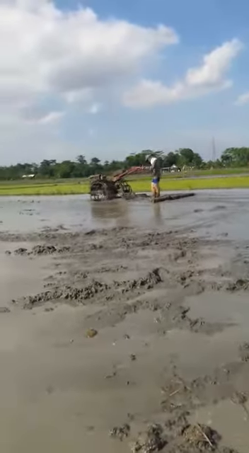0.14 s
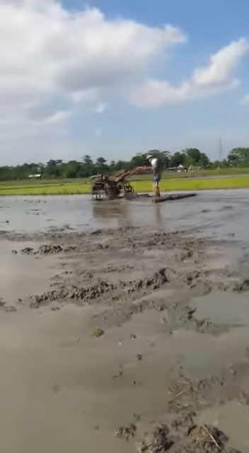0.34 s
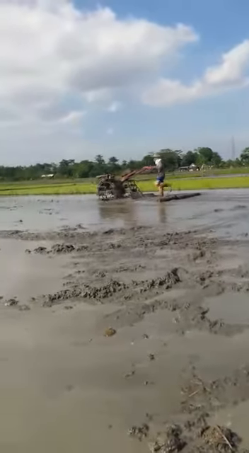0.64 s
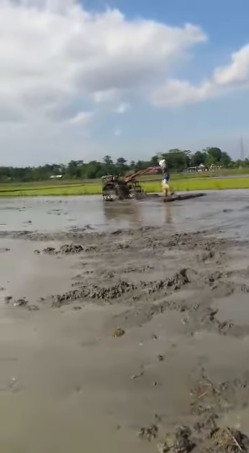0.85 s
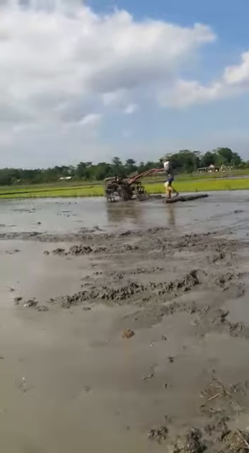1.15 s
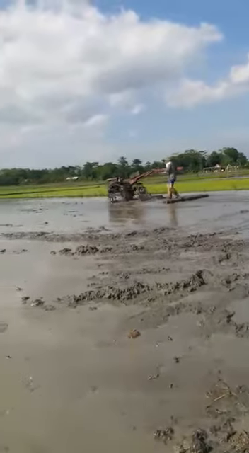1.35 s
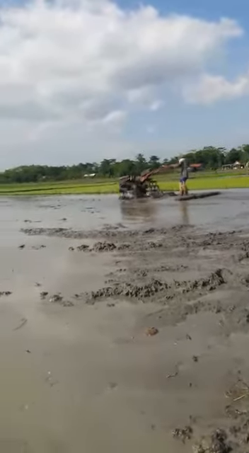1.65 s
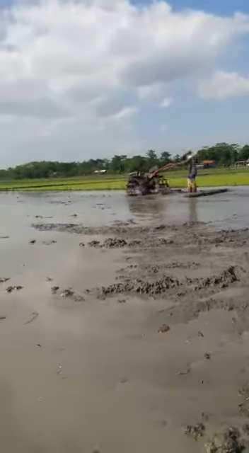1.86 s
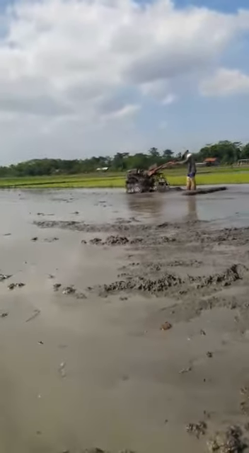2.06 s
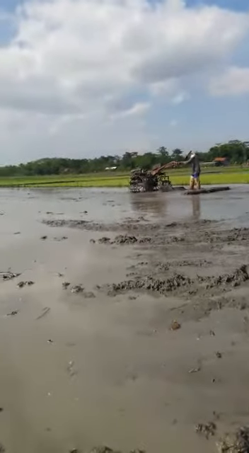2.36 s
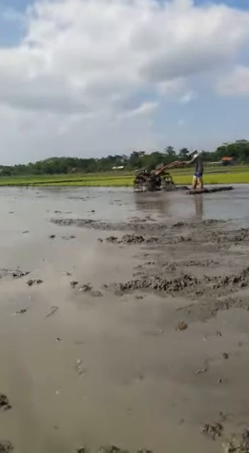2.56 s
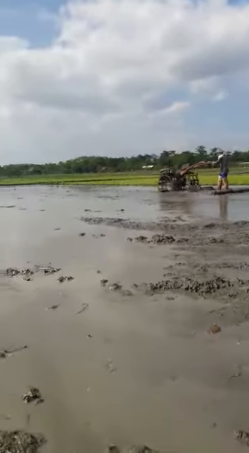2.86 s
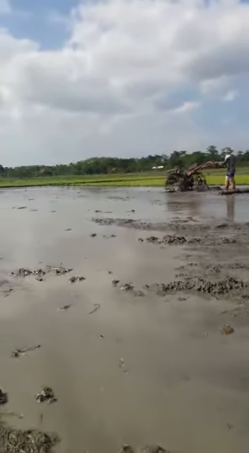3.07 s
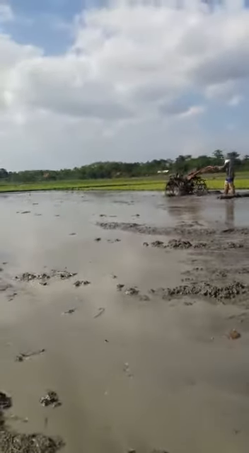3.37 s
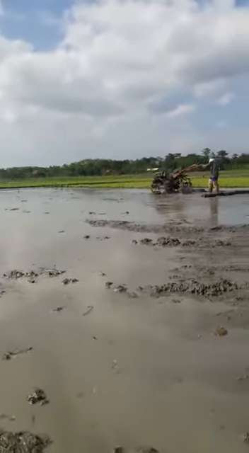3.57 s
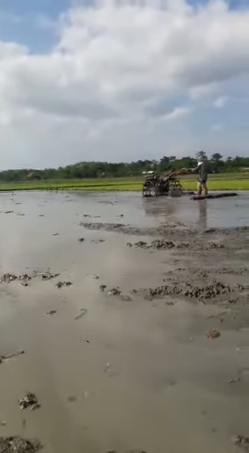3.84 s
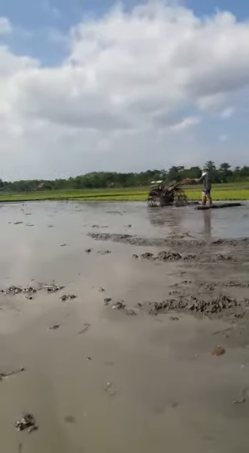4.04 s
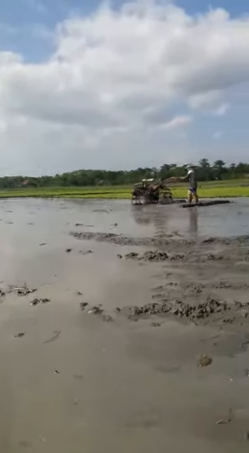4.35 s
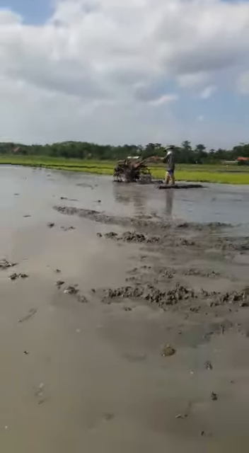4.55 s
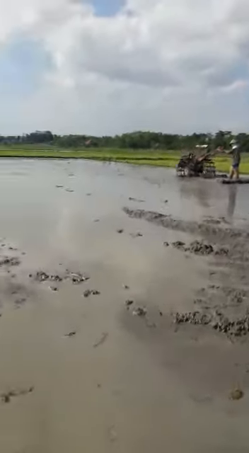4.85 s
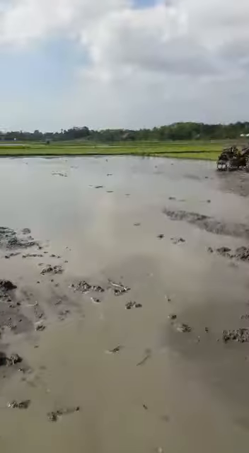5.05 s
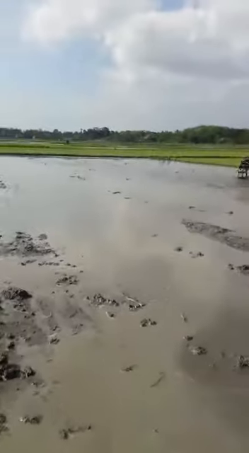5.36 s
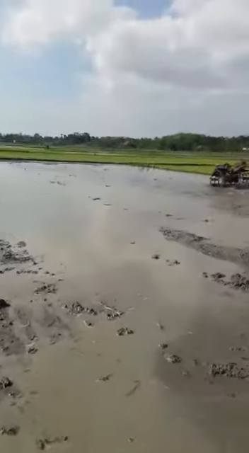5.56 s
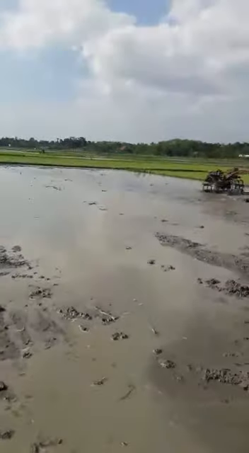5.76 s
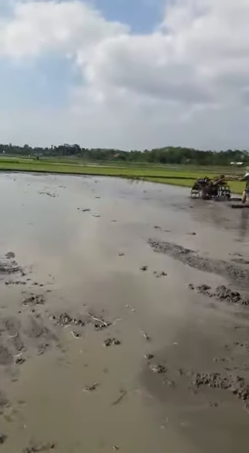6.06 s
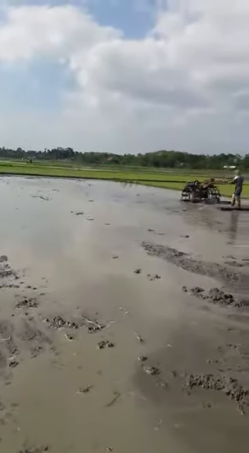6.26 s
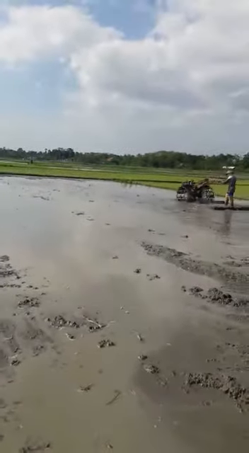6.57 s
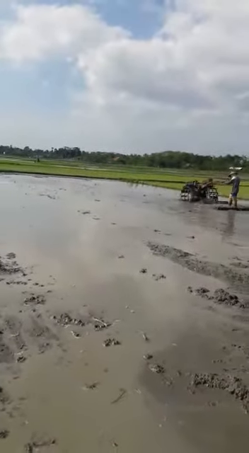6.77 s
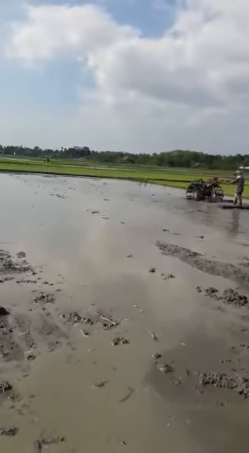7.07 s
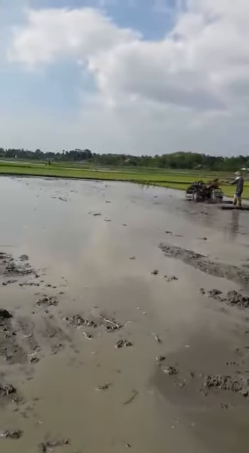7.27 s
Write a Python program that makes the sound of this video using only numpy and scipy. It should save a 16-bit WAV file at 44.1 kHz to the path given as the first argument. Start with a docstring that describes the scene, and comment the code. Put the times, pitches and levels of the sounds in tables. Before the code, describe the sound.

Wind rumbles and thumps on the microphone while a single-cylinder diesel tractor knocks along in a rapid, even beat, faintly splashing.

```python
"""Tractor in a flooded field

Some way off, a two-wheel tractor's one-cylinder diesel pulls steadily while its wheels churn the water.
Each cycle brings a knock as the fuel fires, the exhaust's pop and hiss, then valve and intake thuds.
The tractor turns slowly, so other panels face us. Gusts hit the microphone, hardest near the end."""
import sys
import numpy as np
from scipy import signal
from scipy.fft import rfft, irfft, next_fast_len
from scipy.io import wavfile
from scipy.ndimage import uniform_filter1d, minimum_filter1d, map_coordinates

SR = 44100
rng = np.random.default_rng(int(sys.argv[2]) if len(sys.argv) > 2 else 0)


def waveform_to_disk(signal):
    """Save audio, clipped to [-1, 1], as 16-bit WAV at the path in sys.argv[1]."""
    frames = np.transpose(np.atleast_2d(signal))
    scaled = np.clip(frames, -1, 1) * 32767
    samples = np.round(scaled).astype(np.int16)
    wavfile.write(sys.argv[1], SR, samples)


N = 326781

# How hard the engine works: time_s, knock_change_db, exhaust_change_db
ENGINE_EFFORT = [(0, -2, -3), (1.4, 1.5, -0.5), (2.2, -0.2, 0), (3.3, 0.5, 1.5), (4.2, -2.5, 0.5),
                 (5.3, 0.5, .5), (6.5, 0.5, -2.5), (7.41, 1.5, 0.5)]


def thuds():
    """The engine's low pressure pulses repeat almost exactly from cycle to cycle."""
    # Rows are compression, burning fuel, exhaust crack, exhaust pop, silencer boom, valve and intake:
    # delay_s (from the exhaust opening), pitch_hz, level_db, rise_s
    pulses = [(-.036, 112, -32, 0.0046), (-.025, 518, -28.5, 0.0095), (-.006, 330, -27.5, 0.0026),
              (-.0035, 170, -19, 0.0042), (.003, 111, -23.5, 0.0063), (.023, 267, -20, 0.003),
              (0.049, 166, -21.5, 0.0036)]
    sound = np.zeros(N)
    for delay_s, hz, db, rise_s in pulses:
        hits = beats(delay_s, scatter_db=-0.03, jitter_s=0.00019)
        sound += amp(db) * played(hits, lambda t: swell(t, rise_s) * np.sin(2 * np.pi * hz * t))
    return sound


def knock():
    """The fuel fires and cracks against the cylinder head, almost alike in every cycle."""
    # How the head and its covers ring: pitch_hz, width_hz, side_db, angled_db, front_db
    head_tones = [(1739, 139, 2.5, -5.5, -10.5), (1996, 110, -4, -8.5, -16.5),
                  (2417, 134, 1.5, -9.5, -17.5), (2745, 122, -1, -0.5, -16), (2860, 170, 1.5, -10, -18),
                  (3330, 79, -17, -14, -19)]
    force = strike(beats(-0.019, scatter_db=0, jitter_s=0.00003), decay_s=0.005)
    ring = unit(radiate(force, head_tones, vary_db=-0.44))
    crack = colour(force, [(900, -36), (1700, 8), (2900, -6), (3600, -7), (7000, -22), (14000, -41)])
    knock_db, _ = curves(ENGINE_EFFORT)
    return amp(knock_db - 40.5) * (ring + amp(-10) * crack)


def piston_slap():
    """As the fuel fires, the piston rocks against the cylinder wall and shakes the engine case."""
    # How the case rings: pitch_hz, width_hz, side_db, angled_db, front_db
    case_tones = [(833, 95, -7, -4, -4), (1021, 77, 4, -4.5, -4), (1139, 96, 1.5, -3.5, -6),
                  (1345, 153, -9, 0.5, -1.5)]
    force = strike(beats(-0.0222, scatter_db=0.45, jitter_s=0.00006), decay_s=0.0082)
    ring = unit(radiate(force, case_tones, vary_db=0.5))
    clatter = unit(resonate(force, hz=1364, width_hz=1150))
    knock_db, _ = curves(ENGINE_EFFORT)
    return amp(knock_db - 42) * (ring + amp(-10.5) * clatter)


def exhaust():
    """Each jet of gas hisses through the pipe and trails off; now and then one spits harder."""
    # How the pipe rings: pitch_hz, width_hz, side_db, angled_db, front_db
    pipe_tones = [(1050, 156, 11.5, 0.5, -14), (1787, 460, -1, -6, -1), (2550, 930, 4, -2, -6.5),
                  (3626, 630, 4, -6, 1), (5214, 500, -1.5, 1, -3), (6020, 300, -5, -14.5, -2.5),
                  (9280, 1200, -12, -14.5, -22), (10200, 1340, -16, -21.5, -14.5),
                  (11760, 520, -13, -18, -23)]
    # The harder puffs: time_s, extra_db
    spits = [(.445, 1.5), (1.95, 6.5), (2.39, 2.5), (3.19, 4), (3.28, 2), (6.46, 5)]
    t = np.arange(N) / SR
    spit_db = sum(db * (np.abs(t - s) < 0.04) for s, db in spits)
    puffs = amp(spit_db) * beats(-0.002, scatter_db=1.5, jitter_s=0.00047)
    jet = played(puffs, lambda t: swell(t, peak=0.0026) + 0.16 * swell(t, peak=0.0094))
    hiss = radiate(jet * rng.standard_normal(N), pipe_tones, vary_db=2.1)
    _, exhaust_db = curves(ENGINE_EFFORT)
    return amp(exhaust_db - 42.5) * unit(hiss)


def machinery():
    """Fan and gears churn, frame and panels drone, and the valve parts clack once a cycle."""
    # Low churn of fan and frame: pitch_hz, relative_db
    churn_spectrum = [(25, -67), (60, -4), (110, -1), (300, 3), (420, -6), (560, -2), (660, -12),
                      (1200, -12), (3000, -63)]
    # Thin panels that keep shivering: pitch_hz, width_hz, side_db, angled_db, front_db
    panel_tones = [(1740, 250, -5, -7, -9.5), (2512, 200, 3, -4.5, -17), (2818, 230, -3, -5, -15.5)]
    # The machine's steady hiss: pitch_hz, width_hz, side_db, angled_db, front_db
    hiss_bands = [(3620, 670, 4, -3, 5.5), (4800, 640, -17, -5, 6.5), (5270, 450, 2, 0.5, -8),
                  (6080, 600, -5, -12, 0.5), (7160, 670, 2, -1, -9.5), (11500, 1500, -13, -18, -20)]
    churn = amp(-37) * noise(churn_spectrum)
    gears = amp(-43 + 2.8 * wobble(70)) * noise([
        (500, -38), (720, -3), (900, 1), (1250, 2), (1500, -3.5),
        (2000, -6.5), (2800, -12), (3400, -32), (6000, -53)])
    drone = amp(-43) * unit(resonate(rng.standard_normal(N), hz=517.3, width_hz=67))
    panels = amp(-48.5) * unit(radiate(rng.standard_normal(N), panel_tones, vary_db=2))
    hiss = amp(-56.5) * unit(radiate(rng.standard_normal(N), hiss_bands, vary_db=2.5))
    valve_hits = beats(0.025, scatter_db=1.5, jitter_s=0.000099)
    clack = amp(-46.5) * unit(resonate(valve_hits, hz=817, width_hz=470))
    return churn + gears + drone + panels + hiss + clack


def wind():
    """Swirling air rumbles on the microphone; strong gusts add a rasp and sharp thumps."""
    # The wind's rumble: pitch_hz, relative_db
    rumble_spectrum = [(12, -60), (20, -29), (96, 1), (163, 2), (261, -5), (308, -3), (368, -9.5),
                       (520, -13), (822, -31.5), (1300, -57), (2200, -120)]
    # Small swirls that thump the microphone: start_s, relative_db, pitch_hz
    swirls = [(.112, -14, 224), (5.121, -11, 262), (5.144, -6.5, 257), (5.172, -3, 310), (5.363, -16, 229),
              (5.888, -1.5, 226), (6.014, 2.5, 330), (6.387, -8, 276), (6.551, -4.5, 328), (6.609, -5, 284),
              (6.632, -2, 310), (6.762, -8, 240), (6.784, -3, 270), (7.042, -5, 298)]
    wind_db = wind_strength()
    lumps = unit(amp(2.4 * wobble(90)))
    rumble = amp(wind_db + 0.42) * lumps * noise(rumble_spectrum)
    flutter = unit(amp(4 * wobble(130)))
    rasp_noise = noise([(200, -9), (600, 1.5), (1400, -6.5), (2500, -24), (6000, -63)])
    rasp = amp(1.405 * wind_db - 14) * flutter * rasp_noise  # grows faster than the rumble
    thumps = np.zeros(N)
    for start_s, db, hz in swirls:
        cycles = hz * np.maximum(np.arange(N) / SR - start_s, 0)
        thumps += amp(db) * swell(cycles, peak=0.31) * np.sin(2 * np.pi * cycles)
    return rumble + rasp + amp(4) * thumps


def wind_strength():
    """The wind's level in dB: each gust rises, holds and falls away on top of the breeze."""
    # The breeze between gusts: time_s, level_db
    breeze = [(0, -26), (1.2, -29.5), (2.2, -32), (4.8, -35.5), (5.7, -29), (6.3, -38), (7.41, -35)]
    # Gusts that hit the microphone: start_s, hold_s, level_db
    gusts = [(0.007, 0.025, -20), (0.102, 0.026, -18.5), (0.16, 0.077, -24), (0.418, 0.179, -25.5),
             (0.872, 0.094, -23.5), (1.241, 0.062, -19.5), (4.075, 0.062, -27.5), (4.28, 0.057, -24.5),
             (4.58, 0.041, -25.5), (4.81, 0.032, -24.5), (5.09, 0.1, -16), (5.222, 0.025, -16),
             (5.35, 0.058, -18), (5.516, 0.067, -25), (5.666, 0.028, -19), (5.844, 0.063, -12.5),
             (5.931, 0.16, -15), (6.127, 0.061, -19.5), (6.365, 0.053, -17), (6.479, 0.098, -19.5),
             (6.61, 0.058, -11.5), (6.703, 0.1, -16.5), (6.81, 0.077, -24), (6.907, 0.04, -17.5),
             (6.976, 0.082, -17), (7.396, 0.033, -18.5)]
    rise_s, fall_s = 0.007, 0.008
    t = np.arange(N) / SR
    power = amp(curves(breeze)[0] + 0.75 * wobble(13)) ** 2
    for start_s, hold_s, db in gusts:
        fade = np.maximum(start_s - t, 0) / rise_s + np.maximum(t - start_s - hold_s, 0) / fall_s
        power += (amp(db) * np.exp(-np.minimum(fade, 20))) ** 2
    return 10 * np.log10(power)


def water():
    """The cage wheels churn the water into a distant fizz and now and then throw up a splash."""
    # How loud the water fizzes: time_s, level_db
    fizz_levels = [(0, -58), (1.8, -55.5), (3.3, -60.5), (4.8, -56), (6, -57.5)]
    # The tone of the fizz: pitch_hz, relative_db
    fizz_spectrum = [(1500, -10), (4300, 0), (7300, -6.5), (8500, -14.5), (11000, -12.5), (16000, -16)]
    # Water thrown up by the wheels: middle_s, level_db, half_length_s
    splashes = [(1.825, -45, 0.14), (4.266, -42, 0.15), (4.733, -45, 0.13), (5.3, -52, 0.26)]
    fizz = amp(curves(fizz_levels)[0] + 1.9 * wobble(25)) * noise(fizz_spectrum)
    t = np.arange(N) / SR
    surge = sum(amp(db) * np.exp(-((t - s) / half_s) ** 2) for s, db, half_s in splashes)
    spray = noise([(900, -20), (1800, 7.5), (3200, -1.5), (4500, -8.5),
                   (7000, -18), (12000, -24), (16000, -24)])
    return fizz + surge * amp(2.3 * wobble(70)) * spray


def exhaust_openings():
    """The times when the exhaust opens: once a cycle, with a spare at each end."""
    # The engine's almost steady speed: time_s, firings_per_s
    speed = [(0, 11.281), (1.25, 11.275), (1.7, 11.418), (2.3, 11.257), (3.7, 11.327), (4.3, 11.348),
             (5.1, 11.344), (5.45, 11.248), (6.4, 11.298)]
    rate, = curves(speed)
    cycles = np.cumsum(rate) / SR
    times = 0.0004 + np.interp(np.arange(int(cycles[-1]) + 1), cycles, np.arange(N) / SR)
    return np.r_[times[0] - 1 / rate[0], times, times[-1] + 1 / rate[-1]]


def beats(delay_s, scatter_db, jitter_s):
    """One click a cycle, delay_s from the exhaust opening, a little random in level and timing."""
    openings = exhaust_openings()
    chance = rng.standard_normal((len(openings), 2))
    at = np.round((openings + delay_s + jitter_s * chance[:, 0]) * SR).astype(int)
    inside = (at >= 0) & (at < N)
    return np.bincount(at[inside], amp(scatter_db * chance[inside, 1]), N)


def strike(blows, decay_s, loose=0.5):
    """The parts rattle the same way at every blow, apart from a loose, random share."""
    fade = played(blows, lambda t: np.exp(-t / decay_s))
    fresh = fade * rng.standard_normal(N) / np.sqrt(decay_s * SR / 2)
    return played(blows, lambda t: rattle(t, decay_s)) + loose * fresh


def rattle(t, decay_s):
    """A dying cluster of tiny hits, about equally strong at every pitch."""
    x = np.exp(-t / decay_s) * rng.standard_normal(len(t))
    for _ in range(12):
        evened = irfft(np.exp(1j * np.angle(rfft(x))), len(t))
        x = evened * np.exp(-(t / decay_s / 2) ** 2 / 2)
    return x / np.linalg.norm(x)


def radiate(x, tones, vary_db):
    """Rings x at each tone; how loud it is depends on which way the tractor faces."""
    # The tractor's slow turn: time_s, facing (0 side, 1 angled, 2 front)
    turn = [(0, 0), (1.3, 0.36), (1.95, 0.93), (3.4, 1.27), (4.6, 1.21), (5.2, 1.72), (5.7, 2)]
    facing, = curves(turn)
    sound = np.zeros(N)
    for hz, width_hz, *levels_db in tones:
        db = np.interp(facing, [0, 1, 2], levels_db) + vary_db * wobble(12)
        sound += amp(db) * resonate(x, hz, width_hz)
    return sound


def resonate(x, hz, width_hz, passes=2):
    """Makes x ring around one pitch; more passes cut the other pitches harder."""
    return filtered(x, lambda f: (1j * f * width_hz / (hz * hz - f * f + 1j * f * width_hz)) ** passes)


def played(clicks, shape):
    """Every click starts a short shape, given as a function of time."""
    return signal.fftconvolve(clicks, shape(np.arange(SR // 10) / SR))[:N]


def swell(t, peak):
    """Rises smoothly to 1 at t = peak, then dies away."""
    return (t / peak * np.exp(1 - t / peak)) ** 2


def noise(spectrum):
    """Noise shaped by (pitch_hz, relative_db) points."""
    return colour(rng.standard_normal(N), spectrum)


def colour(x, spectrum):
    """Shapes x by (pitch_hz, relative_db) points and scales it to strength 1."""
    hz, db = np.transpose(spectrum)
    return unit(filtered(x, lambda f: amp(np.interp(np.log(f + 1), np.log(hz + 1), db))))


def filtered(x, response):
    """Multiplies each frequency in x by response(hz)."""
    size = next_fast_len(N + SR // 2)
    return irfft(rfft(x, size) * response(np.fft.rfftfreq(size, 1 / SR)), size)[:N]


def wobble(rate):
    """A smooth curve through rate random points a second."""
    return map_coordinates(rng.standard_normal(int(N * rate / SR) + 4), [np.arange(N) * rate / SR])


def curves(rows):
    """One value per sample for each column after the time."""
    times, *columns = np.transpose(rows)
    return [np.interp(np.arange(N) / SR, times, column) for column in columns]


def amp(db):
    """Turns decibels into a gain."""
    return 10 ** (np.asarray(db) / 20)


def unit(x):
    """Scales x to an average strength (rms) of 1."""
    return x / np.sqrt(np.mean(x ** 2) + 1e-20)


def scene():
    """Engine and water lose narrow bands of pitch across the field; the wind is at the microphone."""
    # Bands that fade as the tractor moves: middle_s, half_length_s, pitch_hz, width_hz, depth (0 to 1)
    dips = [(4.2, 3, 630, 106, 1), (4.55, 0.24, 1095, 260, .85), (4.3, .2, 980, 200, 0.45),
            (6.7, 1.2, 4150, 150, 1), (3.2, 0.83, 7870, 460, 1)]
    far = thuds() + knock() + piston_slap() + exhaust() + machinery() + water()
    t = np.arange(N) / SR
    for middle_s, half_s, hz, width_hz, depth in dips:
        cut = depth * np.exp(-((t - middle_s) / half_s) ** 4)
        far = far - cut * resonate(far, hz, width_hz, passes=1)
    return (far + wind())[None]


def record(dry):
    """The microphone loses deep bass and high treble; a limiter turns the hardest gusts down."""
    bass_hz, treble_hz, top_hz, ceiling_db = 33, 13000, 15800, -0.6
    sound = filtered(dry[0], lambda hz: hz ** 2 / np.hypot(hz ** 2, bass_hz ** 2)
                     / np.sqrt(1 + (hz / treble_hz) ** 10))
    safe_gain = np.minimum(1, amp(ceiling_db) / (np.abs(sound) + 1e-9))
    hold = round(0.046 * SR)
    held_gain = minimum_filter1d(safe_gain, 2 * hold + 1, origin=hold // 2)
    smooth_gain = uniform_filter1d(held_gain, hold)
    return filtered(sound * smooth_gain, lambda hz: hz < top_hz)[None]


dry = scene()
out = record(dry)
waveform_to_disk(out)
```